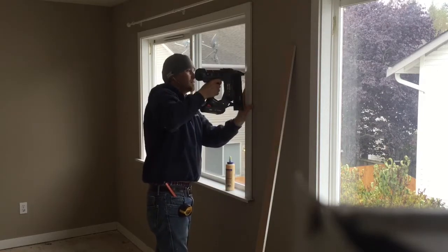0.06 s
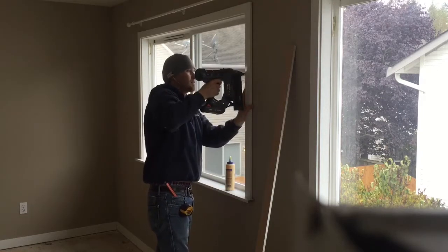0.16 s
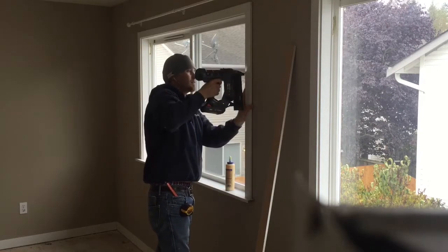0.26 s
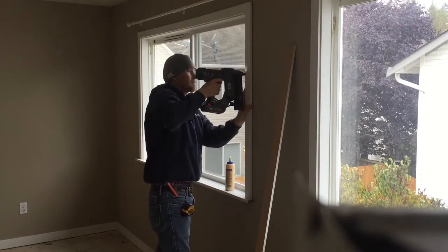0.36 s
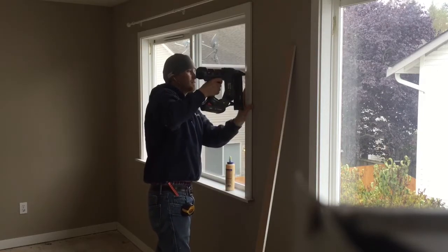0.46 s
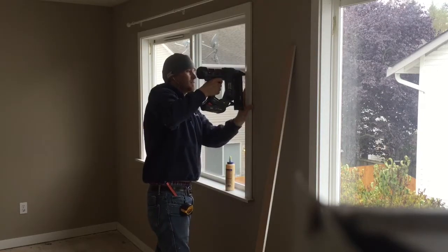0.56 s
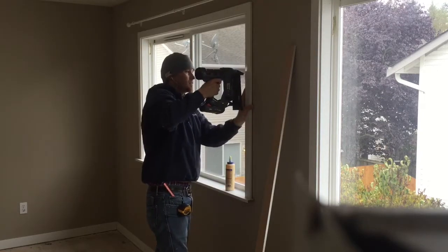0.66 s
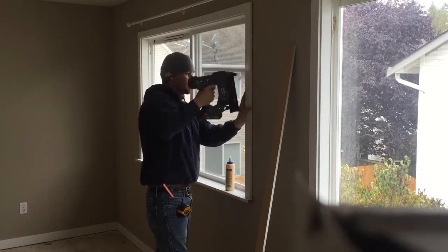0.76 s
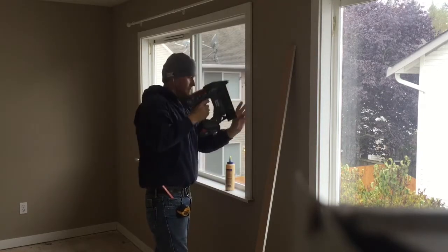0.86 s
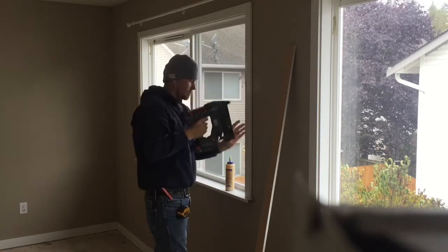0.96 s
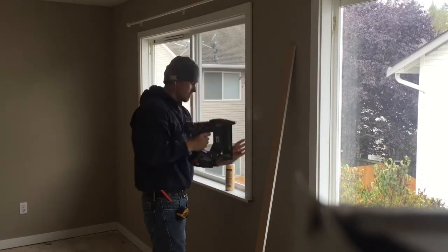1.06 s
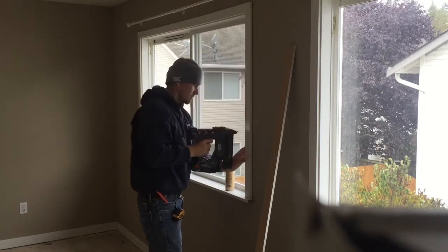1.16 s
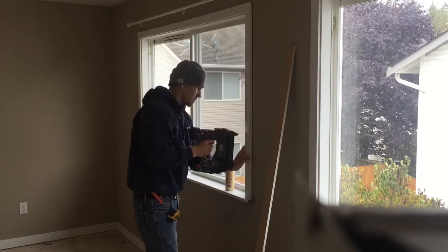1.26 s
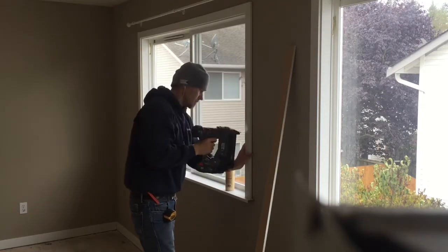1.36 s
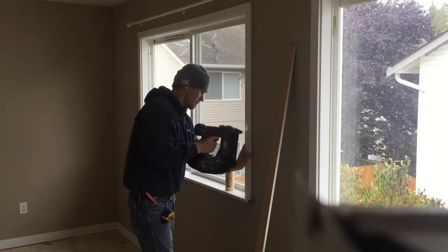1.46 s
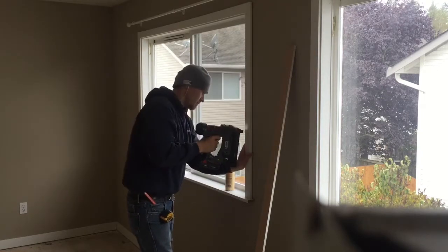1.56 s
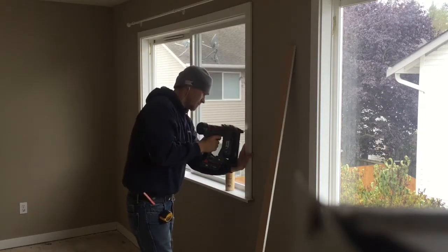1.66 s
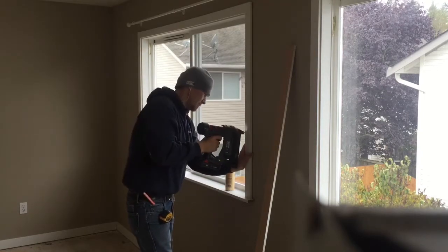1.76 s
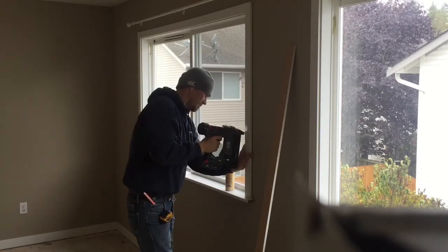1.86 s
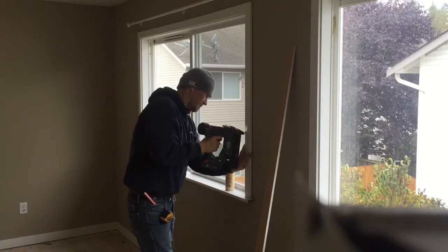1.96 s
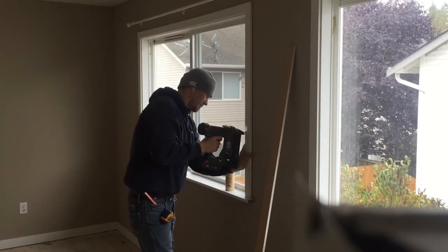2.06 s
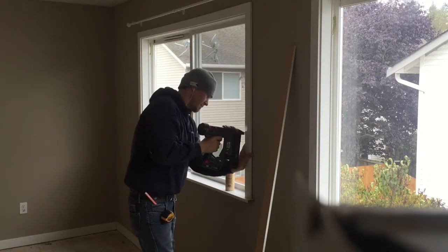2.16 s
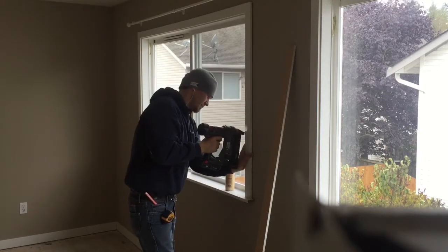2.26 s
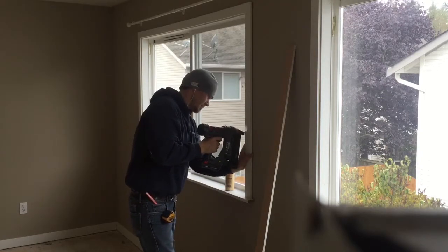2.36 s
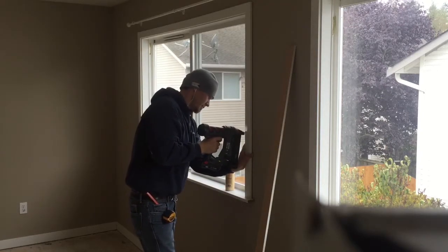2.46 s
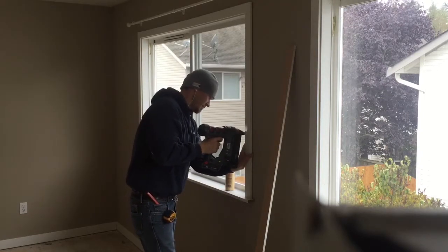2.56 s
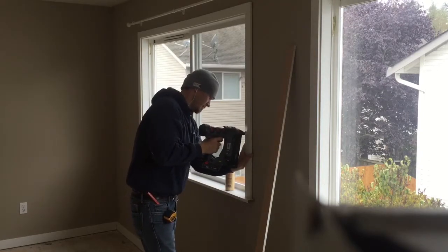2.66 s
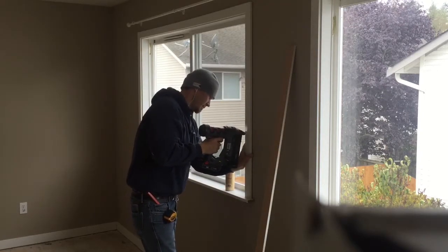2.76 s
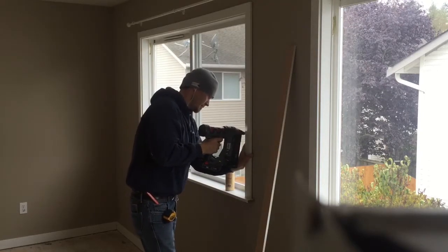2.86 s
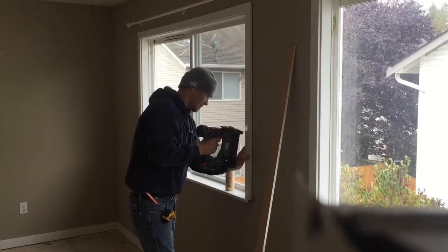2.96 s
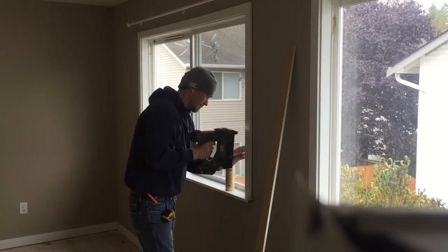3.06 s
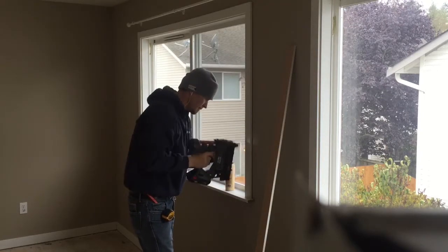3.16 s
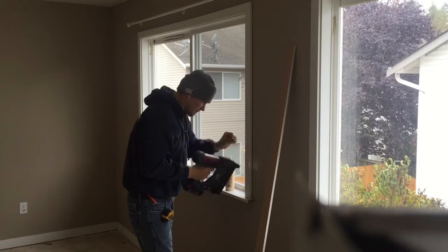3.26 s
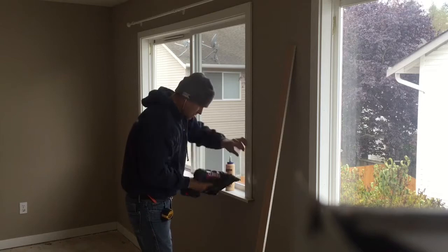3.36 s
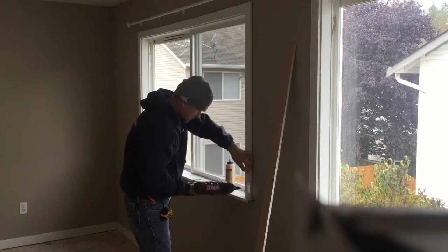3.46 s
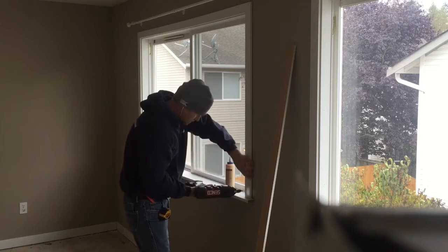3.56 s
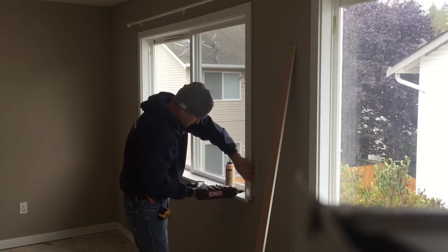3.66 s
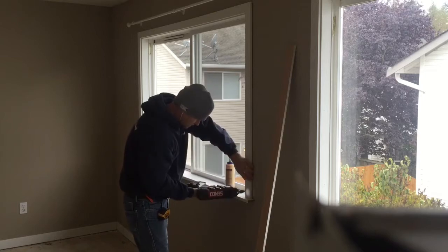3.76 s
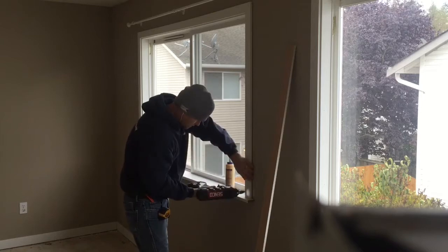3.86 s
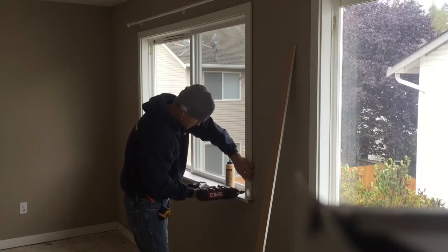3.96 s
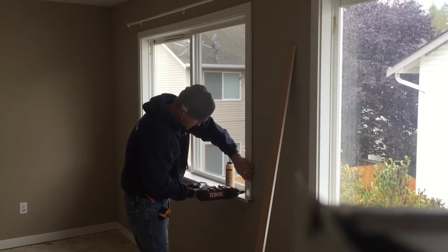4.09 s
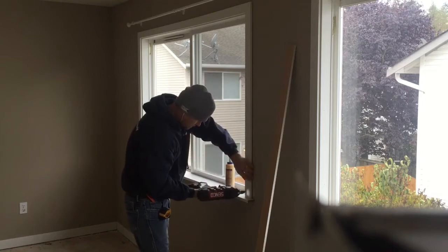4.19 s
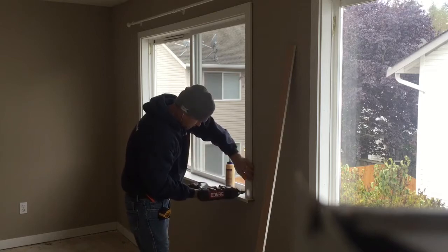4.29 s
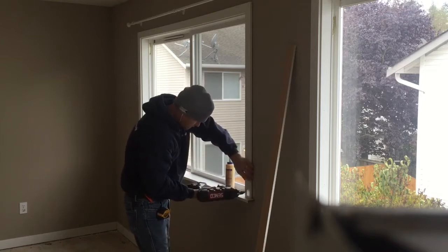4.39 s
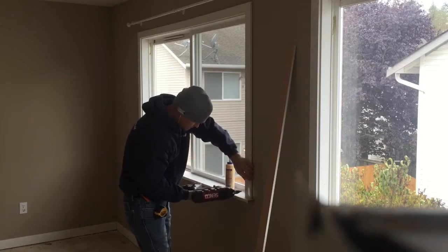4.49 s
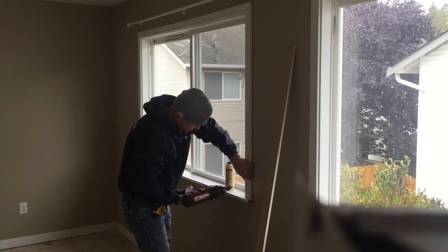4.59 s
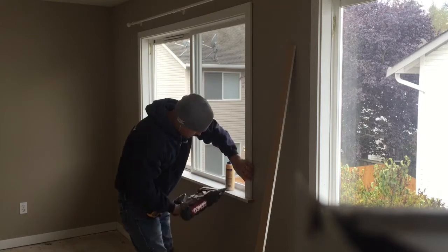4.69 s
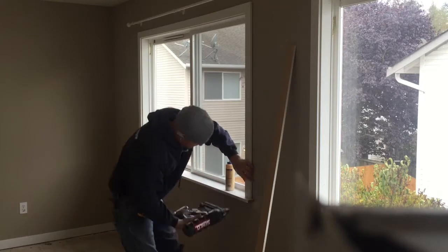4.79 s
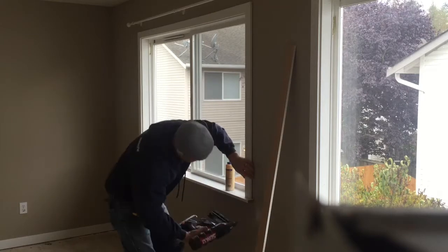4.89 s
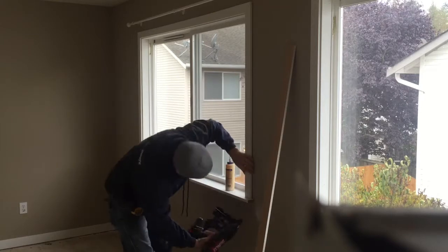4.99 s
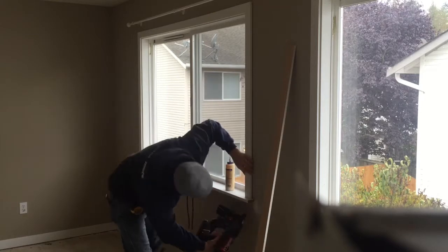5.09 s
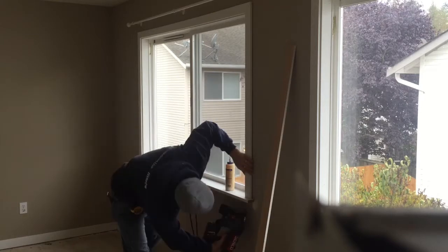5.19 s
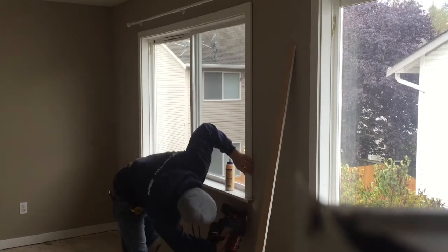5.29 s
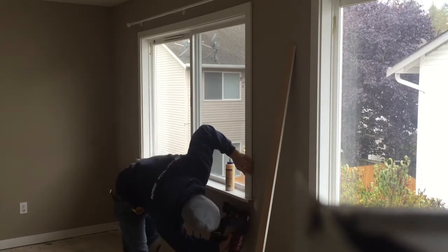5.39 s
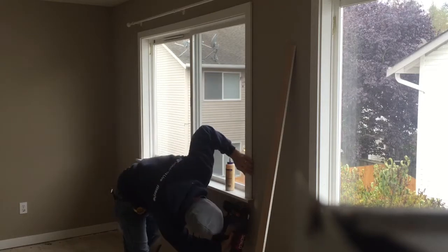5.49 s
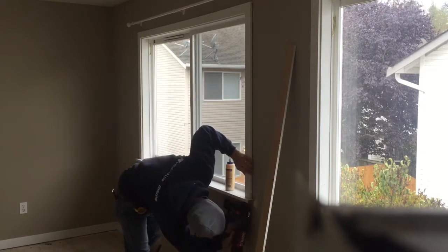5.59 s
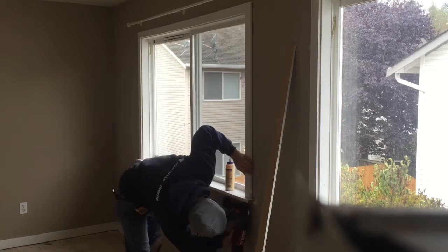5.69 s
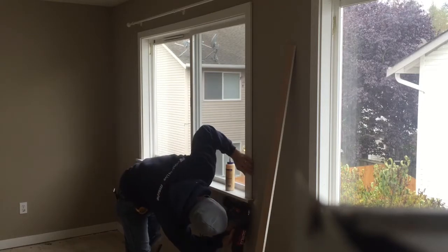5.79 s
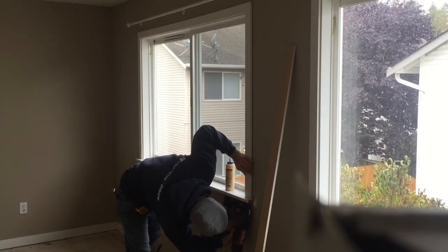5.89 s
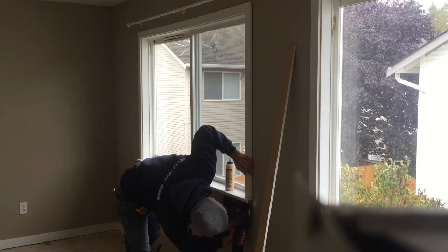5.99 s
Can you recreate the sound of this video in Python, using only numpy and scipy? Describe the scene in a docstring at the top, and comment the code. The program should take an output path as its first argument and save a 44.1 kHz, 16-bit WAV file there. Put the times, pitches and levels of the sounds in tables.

```python
"""Three loud nailer shots in a bare, echoing room, over a steady rush with a faint hum and soft handling ticks.
A cordless nailer drives brads into wooden window trim: trigger click, fading whir, rush, blow, return clack.
Contacts are bursts of coloured noise with echoes; trim and brad ring as narrow noise bands, the wall as
damped sines. The blows overload the microphone."""
import sys
import numpy as np
from scipy import signal
from scipy.fft import rfft, irfft, next_fast_len
from scipy.io import wavfile
from scipy.ndimage import uniform_filter1d, map_coordinates

SR = 44100
rng = np.random.default_rng(int(sys.argv[2]) if len(sys.argv) > 2 else 0)


def unload_wav(signal):
    """Save mono or channel-first audio to the path in sys.argv[1] as 16-bit WAV at rate SR, clipped to [-1, 1]."""
    wavfile.write(
        sys.argv[1],
        SR,
        np.round(np.clip(np.atleast_2d(signal).T, -1, 1) * 32767).astype(np.int16),
    )


N = 266364
T_S = np.arange(3 * SR // 2) / SR  # time since a contact

# Firing cycles. Each row: blow time in seconds, trigger level in dB, blow level in dB, crack level in dB,
# wall thump level in dB, trim pitch at that spot in Hz, wall pitch there in Hz, brad ping in Hz,
# return clack level in dB, housing knock level in dB.
SHOTS = [(0.618, -11, 1, -3.5, -1.5, 758, 296, 5320, -4, -14),
         (2.909, -9.5, 2, -2, -1.5, 1220, 142, 4400, -3, -22),
         (4.402, -13, 2.5, -8.5, 0.5, 1080, 218, 6470, -7.5, -24.5)]
# Rebounds of the driver on its rear stop. Each row: start in seconds, clack level in dB, knock level in dB.
REBOUNDS = [(4.571, -6, -27)]
# Soft handling of the tool. Each row: start in seconds, level in dB, onset time constant in seconds,
# t60 in seconds, room level in dB.
HANDLING = [(3.51, -65, .02, .4, -11), (3.792, -54, .006, .05, -13), (5.02, -37, 0.055, .18, -8),
            (5.776, -40.5, 0.0014, 0.034, -17.5)]
# Modes of the wall and window under the blow. Each row: frequency in Hz, level in dB, t60 in seconds.
WALL_MODES = [(59.6, -4.5, 0.41), (84.3, 0, 0.51), (129, -3.5, .3), (153, 5, 0.41), (212.3, -2.5, 1),
              (220.4, -3, 0.95), (284, -5.5, 0.49)]

# Resonances of trim and tool housing, trigger mechanism, and small parts.
# Each row: centre in Hz, width in Hz, lift in dB.
TRIM_PEAKS = [(719, 34, 2), (854, 60, 1.5), (984, 30, 6.5), (1043, 59, 3), (1104, 118, 5), (1293, 24, 4.5),
              (1400, 34, 2.5), (1526, 20, 7.5), (1716, 23, 5), (1980, 36, 2), (2130, 28, 3), (3170, 35, 7),
              (3690, 360, 4.5), (4096, 85, 6), (4385, 24, 10.5), (4770, 40, 2.5)]
LATCH_PEAKS = [(2880, 130, 7.5), (3960, 190, 5), (4560, 200, 5.5), (5900, 350, 3.5), (8950, 1100, 3.5)]
FITTINGS_PEAKS = [(8700, 600, 2), (12000, 400, 3), (15200, 500, -1)]
# Hollows in the microphone's response. Each row: centre in Hz, width in Hz, gain at the centre in dB.
MIC_HOLLOWS = [(4950, 300, -4), (7530, 500, -3), (10410, 500, -7.5), (14400, 400, -5)]

# Noise colours of blow, crack, trigger click, return clack, drive, wall thump, handling and room rush.
# Each row: frequency in Hz, relative spectral level in dB.
BLOW_COLOUR = [(30, -47), (70, -21), (150, -11.5), (250, -5.5), (400, -10), (550, -6.5), (750, -2.5),
               (1050, -4), (1600, -6.5), (2400, -11), (4000, -14), (6000, -13.5), (9000, -19),
               (15500, -24.5)]
CRACK_COLOUR = [(500, -19.5), (1500, -8), (4000, -5.5), (6300, 2.5), (9000, -2), (10500, -9), (13000, -3),
                (15500, -3.5)]
CLICK_COLOUR = [(300, -22), (1500, -2.5), (2300, -4.5), (2900, -1), (4200, -2), (6200, -5), (8000, -9),
                (10500, -12), (15500, -19)]
CLACK_COLOUR = [(200, -8), (1000, -5.5), (1800, -4), (3200, -1.5), (4500, -0.5), (6000, -2), (9500, -4),
                (11500, -5), (13600, -6), (15500, -9)]
WHIR_COLOUR = [(200, -12.5), (1200, 3), (2300, -3), (4200, -5), (6200, -2), (9000, -7.5), (15500, -16.5)]
THUMP_COLOUR = [(25, -36), (38, -22), (58, -2), (100, -2.5), (150, 0.5), (260, -2.5), (400, -12.5),
                (900, -30), (4000, -71)]
SCUFF_COLOUR = [(500, -10), (2500, 7), (5000, 3), (7000, 0), (9000, -3), (11000, -8), (15500, -10)]
AIR_COLOUR = [(25, -34), (55, -21.5), (80, -8), (105, -14.5), (160, -7.5), (210, -7), (250, -2.5),
              (280, -7), (400, -6), (620, -2.5), (950, -2), (1600, -7.5), (2400, -17), (4000, -25),
              (6300, -36), (10000, -52.5), (15500, -58)]

# Hum lines. Each row: frequency in Hz, mean level in dB rms.
HUM_LINES = [(80.7, -55), (118.4, -54.5), (253.0, -49), (538.3, -56), (656.8, -49), (925.9, -52.5)]
# Reverberation of the room. Each row: frequency in Hz, t60 in seconds.
ROOM_T60 = [(60, 0.6), (160, 0.88), (420, 1.42), (1100, 1.63), (2900, 1.303), (5500, 1.124), (8000, 0.83),
            (11000, 0.61), (15000, 0.49)]

# Cycle timing relative to the blow
TRIGGER_LEAD_S, RUSH_LEAD_S, RETURN_LAG_S = 0.040, 0.0036, 0.153
WHIR_DB, WHIR_ONSET_S, WHIR_T60_S = -29.5, 0.013, 0.53
# Rush, brad ping and trim knock: levels relative to the blow
RUSH_REL_DB, RUSH_ONSET_S, RUSH_T60_S = -9.5, 0.0045, 0.077
BRAD_REL_DB, SPOT_REL_DB = -15.5, -9.5
# Wall give; its ring is relative to the thump
GIVE_ONSET_S, GIVE_T60_S, WALL_RING_REL_DB = 0.011, 0.12, -21.5
AIR_RMS_DB, AIR_PATCH_RMS_DB = -34.5, 1.5
TOP_HZ = 15750


def amp(db):
    """Decibels to gain."""
    return 10 ** (np.asarray(db) / 20)


def unit(x):
    """Scale to rms 1."""
    return x / np.sqrt(np.mean(x ** 2) + 1e-20)


def along(points, hz):
    """Interpolate (Hz, value) points on a log-frequency axis."""
    point_hz, value = np.transpose(points)
    return np.interp(np.log(hz + 1), np.log(point_hz + 1), value)


def fade(t_s, t60_s):
    """Exponential decay, 60 dB per t60."""
    return np.exp(-np.log(1000) * t_s / t60_s)


def rise(onset_s):
    """Exponential onset from 0 towards 1 with the given time constant."""
    return 1 - np.exp(-T_S / onset_s)


def wobble(rate_hz, size):
    """Smooth random curve through rate_hz knots a second."""
    knots = rng.standard_normal(int(size * rate_hz / SR) + 4)
    return map_coordinates(knots, [np.arange(size) * rate_hz / SR])


def add(track, start_s, x):
    """Mix x into the track from start_s."""
    start = round(start_s * SR)
    track[start:start + len(x)] += x[:N - start]


def noise(colour, size, peaks=(), ripple_db=0.0):
    """Noise of rms 1 with a broad colour, resonant peaks and the fine ripple of standing waves."""
    hz = np.fft.rfftfreq(size, 1 / SR)
    db = along(colour, hz)
    for centre_hz, width_hz, lift_db in peaks:
        db = db + lift_db / (1 + (2 * (hz - centre_hz) / width_hz) ** 2)
    knots_hz = np.arange(0, SR / 2, 9)
    db = db + ripple_db * np.interp(hz, knots_hz, rng.standard_normal(len(knots_hz)))
    return unit(irfft(rfft(rng.standard_normal(size)) * amp(db), size))


def ring(modes, onset_s):
    """Damped sine modes, each with random strength and phase."""
    chance = rng.standard_normal((len(modes), 2))
    total = np.zeros(len(T_S))
    for (hz, db, t60_s), (offset_db, half_turns) in zip(modes, chance):
        wave = np.sin(2 * np.pi * hz * T_S + np.pi * half_turns)
        total += amp(db + offset_db) * fade(T_S, t60_s) * wave
    return total * rise(onset_s)


def knock(hz, width_hz, t60_s, onset_s=0.0017):
    """Brief cluster of close modes: a decaying narrow noise band around one pitch."""
    bin_hz = np.fft.rfftfreq(len(T_S), 1 / SR)
    band = 1 / (1 + (2 * (bin_hz - hz) / width_hz) ** 4)
    cluster = irfft(rfft(rng.standard_normal(len(T_S))) * band, len(T_S))
    return unit(cluster) * fade(T_S, t60_s) * rise(onset_s)


def echo(source, build_s, early_db, early_t60_s=0.36, flutter_db=1.3):
    """Bare room's answer: uneven first reflections and a tail decaying at each frequency's own t60."""
    hz, t_s, z = signal.stft(source(), SR, nperseg=512)
    decay = fade(t_s, along(ROOM_T60, hz)[:, None])
    tail = signal.istft(z * decay, SR, nperseg=512)[1][:len(T_S)]
    flutter = amp(early_db + flutter_db * wobble(500, len(T_S)))
    first = flutter * fade(T_S, early_t60_s) * source()
    return (tail + first) * rise(build_s)


def contact(colour, peaks, onset_s, t60_s, room_db, build_s, early_db, chatter_db=1.0):
    """Short chatter of parts striking each other: a fluctuating noise burst and its echo."""
    def source():
        return noise(colour, len(T_S), peaks)

    chatter = amp(chatter_db * wobble(1200, len(T_S)))
    direct = source() * chatter * fade(T_S, t60_s) * rise(onset_s)
    return direct + amp(room_db) * echo(source, build_s, early_db)


def room_tone():
    """Steady, slightly patchy rush coloured by the room's standing waves, with wavering hum lines."""
    z = signal.stft(noise(AIR_COLOUR, N, ripple_db=2.0), nperseg=1024)[2]
    # smoothed over frequency, then time
    patches = uniform_filter1d(rng.standard_normal(z.shape), size=5, axis=0)
    patches = uniform_filter1d(patches, size=10, axis=1)
    patch_gain = amp(AIR_PATCH_RMS_DB * unit(patches))
    rush = unit(signal.istft(z * patch_gain, nperseg=1024)[1][:N])
    t_s = np.arange(N) / SR
    hum = np.zeros(N)
    for hz, rms_db in HUM_LINES:
        level = amp(rms_db + 0.86 * wobble(2.3, N)) * np.sqrt(2)
        hum += level * np.sin(2 * np.pi * hz * t_s + 0.21 * wobble(6, N))
    return amp(AIR_RMS_DB) * rush + hum


def handling():
    """Faint ticks and a scuff as the tool is moved: chattering noise bursts."""
    out = np.zeros(N)
    for start_s, db, onset_s, t60_s, room_db in HANDLING:
        scuff = contact(SCUFF_COLOUR, FITTINGS_PEAKS, onset_s, t60_s, room_db,
                        build_s=0.03, early_db=13.5, chatter_db=4.5)
        add(out, start_s, amp(db) * scuff)
    return out


def triggers():
    """The trigger clicks and engages the drive, whose whir swells and fades."""
    out = np.zeros(N)
    for blow_s, trigger_db, *_ in SHOTS:
        click = contact(CLICK_COLOUR, LATCH_PEAKS, onset_s=0.00074, t60_s=0.0145,
                        room_db=-17.5, build_s=0.0022, early_db=1.5)
        whir = noise(WHIR_COLOUR, len(T_S), LATCH_PEAKS) * fade(T_S, WHIR_T60_S) * rise(WHIR_ONSET_S)
        add(out, blow_s - TRIGGER_LEAD_S, amp(trigger_db) * click + amp(WHIR_DB) * whir)
    return out


def returns():
    """A set time after each blow, and on rebounds, the driver clacks on its rear stop and knocks the housing."""
    out = np.zeros(N)
    strokes = [(blow_s + RETURN_LAG_S, clack_db, knock_db) for blow_s, *_, clack_db, knock_db in SHOTS]
    for start_s, clack_db, knock_db in strokes + REBOUNDS:
        clack = contact(CLACK_COLOUR, [], onset_s=0.0016, t60_s=0.026,
                        room_db=-16.5, build_s=0.0053, early_db=-5.0)
        add(out, start_s, amp(clack_db) * clack)
        housing = knock(2400, width_hz=640, t60_s=0.096, onset_s=0.001)
        add(out, start_s, amp(knock_db) * housing)
    return out


def shots():
    """The driver rushes forward and sinks the brad with a crack; the wall gives, trim and wall ring on."""
    out = np.zeros(N)
    for blow_s, _, blow_db, crack_db, thump_db, trim_hz, wall_hz, brad_hz, *_ in SHOTS:
        rush = noise(WHIR_COLOUR, len(T_S)) * fade(T_S, RUSH_T60_S) * rise(RUSH_ONSET_S)
        add(out, blow_s - RUSH_LEAD_S, amp(blow_db + RUSH_REL_DB) * rush)

        crack = contact(CRACK_COLOUR, [], onset_s=0.0004, t60_s=0.042,
                        room_db=-21.5, build_s=0.003, early_db=7.5)
        add(out, blow_s, amp(crack_db) * crack)
        ping = knock(brad_hz, width_hz=150, t60_s=0.12, onset_s=0.0005)
        add(out, blow_s, amp(blow_db + BRAD_REL_DB) * ping)
        blow = contact(BLOW_COLOUR, TRIM_PEAKS, onset_s=0.001, t60_s=0.11,
                       room_db=-11.0, build_s=0.0086, early_db=2.5)
        add(out, blow_s, amp(blow_db) * blow)

        # each spot on trim and wall has its own resonance
        spot = knock(trim_hz, width_hz=240, t60_s=0.25)
        add(out, blow_s, amp(blow_db + SPOT_REL_DB) * spot)
        give = fade(T_S, GIVE_T60_S) * rise(GIVE_ONSET_S) ** 2
        thump = noise(THUMP_COLOUR, len(T_S), [(wall_hz, 70, 8)]) * give
        add(out, blow_s, amp(thump_db) * thump)
        wall = ring(WALL_MODES, onset_s=0.0079)
        add(out, blow_s, amp(thump_db + WALL_RING_REL_DB) * wall)
    return out


def scene():
    """All sounds at the one microphone."""
    return (room_tone() + handling() + triggers() + returns() + shots())[None]


def record(dry, ceiling=0.84, hardness=15.0):
    """The microphone hollows the treble, its input saturates at the ceiling, and a steep low-pass follows."""
    size = next_fast_len(N + SR // 2)
    f_hz = np.fft.rfftfreq(size, 1 / SR)
    response = np.ones(len(f_hz), complex)
    for centre_hz, width_hz, gain_db in MIC_HOLLOWS:
        damping = 1j * f_hz * width_hz
        band = damping / (centre_hz * centre_hz - f_hz * f_hz + damping)
        response *= 1 - (1 - amp(gain_db)) * band
    x = irfft(rfft(dry, size) * response, size)
    x = x / (1 + np.abs(x / ceiling) ** hardness) ** (1 / hardness)
    low_pass = 1 / (1 + (f_hz / TOP_HZ) ** 300)
    return irfft(rfft(x) * low_pass, size)[..., :N]


dry = scene()
out = record(dry)
unload_wav(out)
```